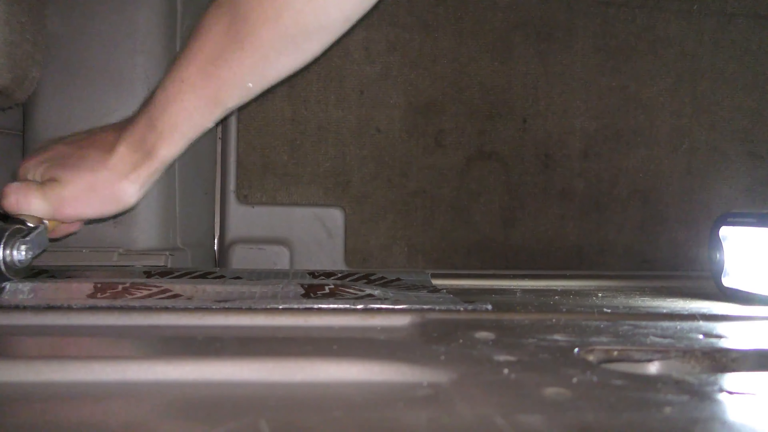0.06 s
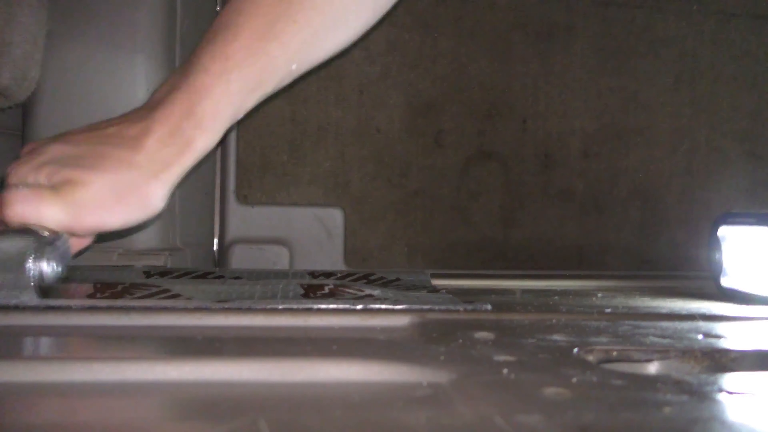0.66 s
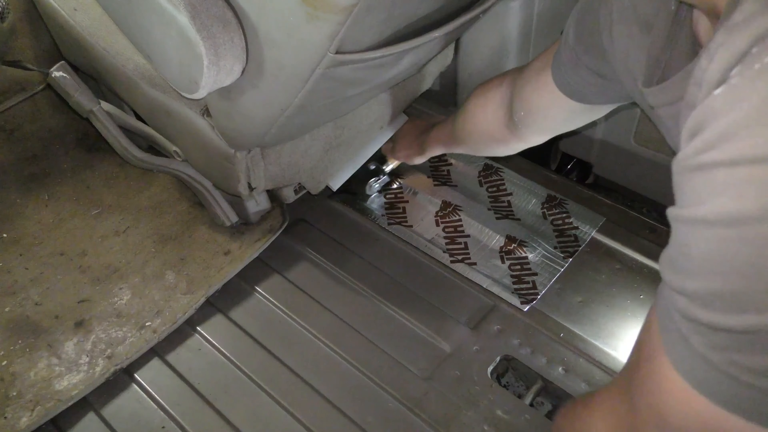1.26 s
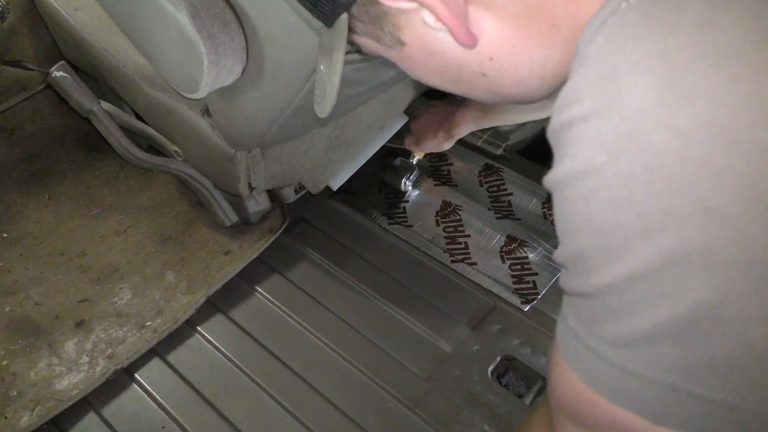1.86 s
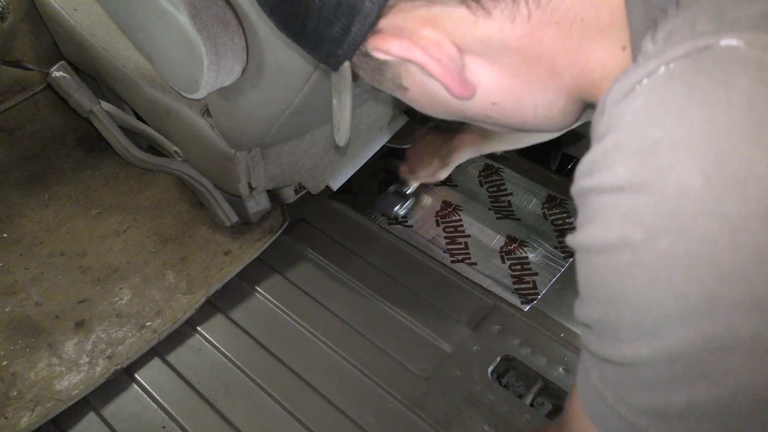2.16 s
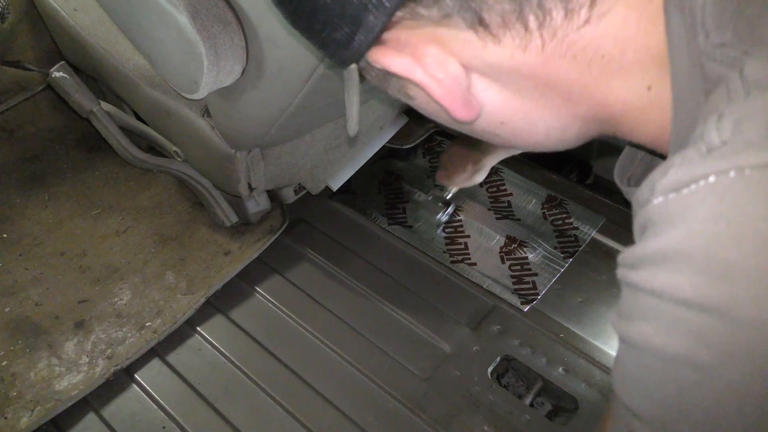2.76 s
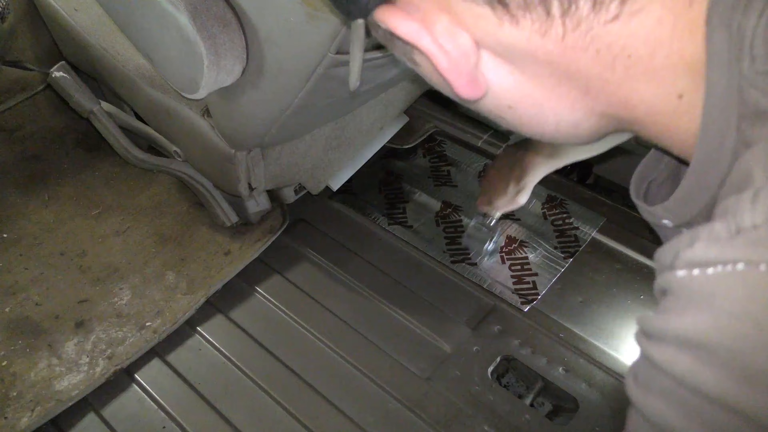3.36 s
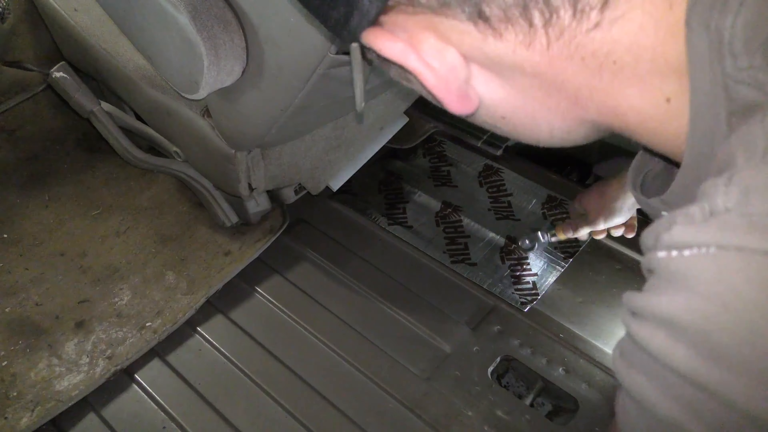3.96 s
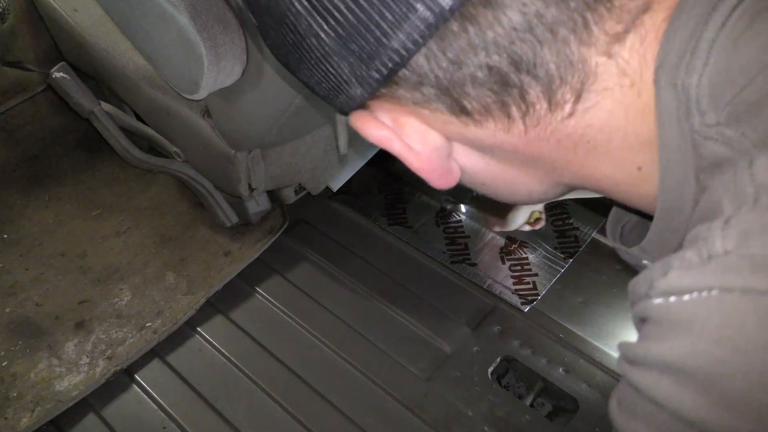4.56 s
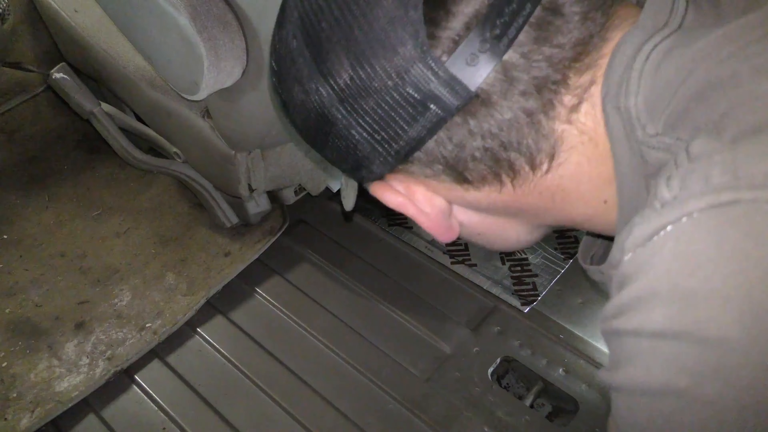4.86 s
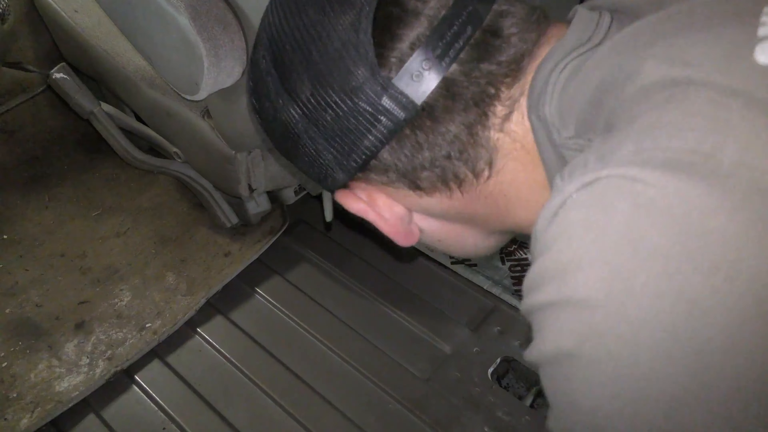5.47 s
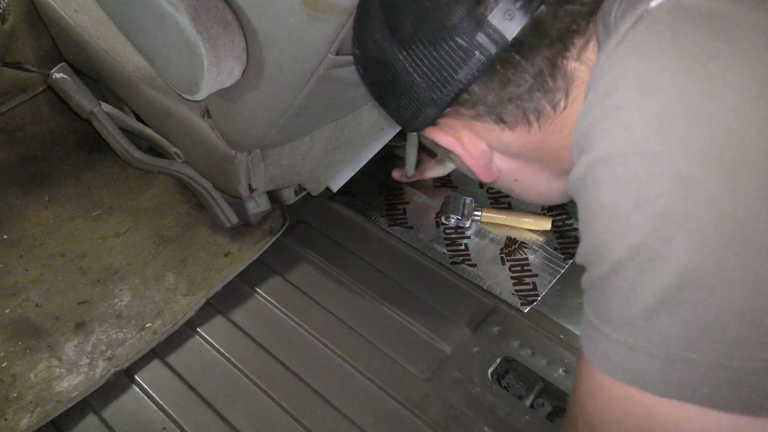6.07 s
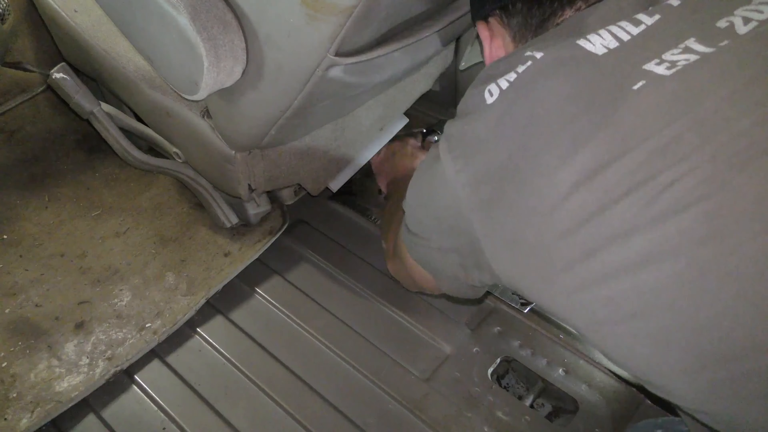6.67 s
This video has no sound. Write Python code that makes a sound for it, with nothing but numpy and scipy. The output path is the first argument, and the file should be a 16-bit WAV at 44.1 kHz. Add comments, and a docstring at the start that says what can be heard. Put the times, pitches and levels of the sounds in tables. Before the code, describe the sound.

Close up inside a van, a hand roller runs over foil matting with a quick, squeaky rattle that makes the sheet-metal floor ring. The sound cuts out for an instant, then returns for a longer stroke with more rubbing. Once the rolling stops, there are short skids, scattered metal clacks and a bright clink, then faint cloth rustle, a dull bump and a few last knocks over low room tone.

```python
"""A steel hand roller presses foil-faced damping mat onto the sheet-metal floor of a van, in two strokes.
On every turn the loose drum judders with a chirp and knocks on its axle; the floor rings, the foil hisses.
The sound breaks off briefly after the first stroke and resumes from above the roller.
Then the roller slides, is lifted and set down with sharp clacks, a shirt swishes and a knee bumps the
floor. Underneath lie a low cabin rumble, room tone and a thin hiss."""
import sys
import numpy as np
from scipy import signal
from scipy.fft import rfft, irfft
from scipy.io import wavfile
from scipy.ndimage import uniform_filter1d

SR = 44100
rng = np.random.default_rng(int(sys.argv[2]) if len(sys.argv) > 2 else 0)


def transcribe(u):
    """Save the signal u as a 16-bit wav file named by the first command-line argument.

    u: samples, shape (n,) or (channels, n), limited to [-1, 1]; the rate is SR.
    q: integer samples, one column per channel.
    """
    v = np.clip(np.atleast_2d(u).T, -1, 1)
    q = np.round(v * 32767).astype(np.int16)
    wavfile.write(sys.argv[1], SR, q)


N = 296352
TIME, BINS = np.arange(N) / SR, np.fft.rfftfreq(N, 1 / SR)
GAP_START_S, GAP_END_S = 1.236, 1.318  # the silence between the two strokes


# The first stroke, turn by turn. Each row: knock time in seconds, then levels in dB for the knock,
# the axle tick, the judder leading into the knock, the back judder half a turn later and the foil hiss.
FIRST_STROKE = [(0.0454, -8.5, -23.5, -31, -48, -42.5), (0.1915, -19.5, -71, -31, -20, -38),
                (.2636, -5.5, -34, -23.5, -36, -38), (.339, -7, -30.5, -27.5, -34, -38),
                (0.406, -7, -32.5, -26, -23, -38), (0.4705, -5.5, -32.5, -22, -35, -40.5),
                (0.5355, -5.5, -45, -22.5, -50, -36.5), (.6042, -6.5, -36, -26, -38, -41),
                (.675, -8, -31, -33, -43, -36), (0.7427, -8.5, -34, -24.5, -42, -41),
                (0.8126, -8, -47, -28, -53, -40), (.875, -7, -34.5, -29.5, -45, -40.5),
                (1.0983, -19.5, -47, -48.5, -58, -49.5), (1.1949, -5.5, -40, -24, -22.5, -33)]
# The second stroke; the knock is weak where the drum misses its stop. Each row: knock time in seconds,
# knock in dB, tick in dB, lead judder in dB, its pitch in Hz, back judder in dB, its pitch in Hz,
# foil hiss in dB.
SECOND_STROKE = [(1.492, -50, -49, -45, 1130, -43, 1010, -47),
                 (1.5761, -13, -45, -24.5, 1058, -47, 1070, -36),
                 (1.657, -17.5, -39, -32.5, 1150.0, -31, 1184, -40.5),
                 (1.7364, -11.5, -34, -22, 1360, -22.5, 1227, -36),
                 (1.823, -12.5, -40, -24, 950, -27, 1364, -37),
                 (1.8924, -8.5, -36, -22, 1177, -30, 1247, -36),
                 (1.9722, -12, -41, -21.5, 1158, -25.5, 1416, -36.5),
                 (2.04, -14.5, -36, -22, 1407, -22, 1207, -33),
                 (2.1102, -12, -33, -21, 1365, -23.5, 1324, -38),
                 (2.1776, -7.5, -30.5, -20, 1233, -24.5, 1340.0, -41),
                 (2.2427, -8.5, -37, -25.5, 1290, -26, 1126, -39.5),
                 (2.3056, -8.5, -32.5, -29, 1410, -22.5, 1234, -34),
                 (2.3688, -8, -27.5, -24, 1370, -25, 1270, -51),
                 (2.4306, -11, -28, -24.5, 1358, -29, 1020, -52),
                 (2.4937, -11.5, -31, -26.5, 1350, -29, 1120, -45),
                 (2.5604, -9.5, -31, -29, 1292, -24, 1230.0, -49),
                 (2.6255, -8.5, -32, -24.5, 1326, -28, 1186, -40.5),
                 (2.6915, -12, -36, -34, 1330, -35, 1220, -40),
                 (2.7536, -11, -34, -40, 1220, -44, 1180, -42),
                 (2.8187, -8, -31.5, -36, 1296, -26, 1190, -38.5),
                 (2.8793, -7.5, -32, -24, 1277, -35, 952, -33.5),
                 (2.9448, -7.5, -34, -26, 1397, -23, 1100, -35.5),
                 (3.0094, -8.5, -32, -30, 1320, -25, 1194, -35),
                 (3.0734, -5.5, -29.5, -30, 1394, -36, 1060, -37.5),
                 (3.1368, -8, -36, -24.5, 1393, -27, 1240, -36.5),
                 (3.202, -9, -49, -26, 1134, -28.5, 1420, -38),
                 (3.263, -5.5, -30, -23.5, 1323, -24.5, 1216, -40.5),
                 (3.3272, -8.5, -42, -25, 1386, -25.3, 1240, -34.5),
                 (3.3904, -7, -34, -22.5, 1370, -24.5, 1265, -35),
                 (3.4524, -8, -27, -24.5, 1380, -26.5, 1306, -35.5),
                 (3.5205, -7, -26, -22.5, 1185, -29, 1180, -36),
                 (3.5826, -9, -29.5, -23, 1308, -31, 1330, -40),
                 (3.648, -34, -38, -23, 1156, -25.5, 1370, -41),
                 (3.7089, -6.5, -29, -23.5, 1364, -27.5, 1270, -34),
                 (3.773, -36, -42, -19.5, 1123, -23, 1230, -37.5),
                 (3.8349, -12, -23, -23, 1365, -23, 1331, -31.5),
                 (3.8968, -6.5, -39, -34, 1164, -37, 1180.0, -37.5),
                 (3.9611, -10.5, -27, -25, 1356, -52, 1053, -35)]

def turns(first_lead_hz=1309, first_back_hz=1096):
    """The roller's rhythm: every turn of the drum, in the columns of the second stroke."""
    first = [(at, knock, tick, lead, first_lead_hz, back, first_back_hz, hiss)
             for at, knock, tick, lead, back, hiss in FIRST_STROKE]
    return first + list(SECOND_STROKE)


# Extra knocks in the first stroke, as the loose drum falls back against its axle.
# Each row: start in seconds, knock level in dB, tick level in dB.
FALLBACKS = [(.195, -9.5, -47), (0.2744, -10.5, -38), (.3546, -9, -35), (.413, -20, -41), (.485, -8.5, -40),
             (.5618, -5, -32.5), (0.6235, -8, -28.5), (0.6995, -7, -27), (.7705, -6, -29),
             (0.8259, -6.5, -36), (.905, -6, -34.5)]
# The hollow note of the panel's belly as the roller crosses it.
# Each row: time in seconds, level against the knock in dB, pitch in Hz.
BELLY = [(0, -19, 763), (1.2, -16.5, 759), (1.6, -7.5, 802), (2.1, -17, 781), (2.24, -17, 798),
         (2.31, -15, 760), (2.4, -7.5, 795), (2.54, -9, 780), (2.63, -10, 800), (2.88, -5.5, 788),
         (3.14, -7.5, 782), (3.3, -15.5, 790), (3.45, -22, 760), (3.95, -25, 810)]

def knocks(hard_hz=1026, ping_hz=4600, bounce_s=0.00624):
    """The drum hits its axle: a thump, a metal tick and a hollow note from the panel."""
    body, ticks, belly = np.zeros((3, N))
    t = TIME[:SR // 4]
    belly_times, *belly_curves = np.transpose(BELLY)
    for at, db, tick_db in list(FALLBACKS) + [row[:3] for row in turns()]:
        pitch_luck, ping_luck, level_luck, lag_luck = rng.standard_normal(4)
        detune = 1 + 0.047 * pitch_luck
        if at < GAP_START_S:  # first stroke: hard and dry
            add(body, at, undb(db) * blow(t, hard_hz * detune, 0.00099, 0.00094, sag=0.1))
            spike = undb(19) * (t == 0)
            add(ticks, at, undb(tick_db) * (snap(t60=.0032) + spike))
        else:  # second stroke: softer, with one bounce
            add(body, at - .0012, undb(db) * soft_knock(t, detune, low_db=-6.5, high_db=-5.5))
            bounce = undb(db + 3.5 * level_luck) * soft_knock(t, detune, low_db=-12.5, high_db=-15)
            add(body, at + bounce_s * (1 + 0.137 * lag_luck), bounce)
            fork_hz = ping_hz * np.exp(0.215 * ping_luck)  # the fork rings differently each time
            ping = np.sin(2 * np.pi * fork_hz * t) * fade(t, 0.025)
            add(ticks, at - .0005, undb(tick_db - 1.5) * (snap(t60=0.0094) + undb(-3) * ping))
        belly_db, belly_hz = (np.interp(at, belly_times, curve) for curve in belly_curves)
        bloom = fade(t, 0.1) * (1 - fade(t, .024))
        add(belly, at, undb(db + belly_db) * np.sin(2 * np.pi * belly_hz * t) * bloom)
    return body, ticks, belly


def soft_knock(t, detune, low_db, high_db, low_hz=831, high_hz=1240):
    """The drum meets its stop and rings briefly in its two main resonances."""
    low = blow(t, low_hz * detune, rise_s=.0022, fall_s=.0034, sag=.03)
    high = blow(t, high_hz * detune, rise_s=.002, fall_s=.0024, sag=.03)
    return undb(low_db) * low + undb(high_db) * high


def blow(t, hz, rise_s, fall_s, sag):
    """The drum bounces on the soft mat: a few damped cycles that sag in pitch as the contact relaxes."""
    attack = np.sin(np.pi / 2 * np.minimum(t / rise_s, 1)) ** 2
    decay = np.exp(-(np.maximum(t - rise_s, 0) / fall_s) ** 2.02)
    pitch = hz * (1 - sag * np.tanh((t - rise_s) / fall_s))
    return np.sin(phase_of(pitch)) * attack * decay


def snap(t60, window_s=0.0017):
    """A crack of steel on steel, with the energy of a short window at rms 1."""
    t = TIME[:SR // 4]
    burst = rng.standard_normal(len(t)) * (fade(t, t60) + undb(-23) * fade(t, .027))
    return burst * np.sqrt(window_s * SR / np.sum(burst ** 2))


# Three chirp shapes. Each row: time from the knock in seconds, pitch as a ratio of the judder's pitch,
# tone level in dB, foil level in dB.
WHIP_JUDDER = [(-.017, .75, -20, -20), (-.011, .88, -2, -7), (-.007, 1.15, 0, 0), (-.003, 1.6, -4, 5),
               (.001, 2.9, -14, -4)]  # first stroke: whips upward until the knock stops it
ARCH_JUDDER = [(-.021, .85, -22, -22), (-.013, .98, 0, -1.5), (-.007, 1.08, 2, -1), (-.001, 1.08, 1, 1),
               (.002, 1.05, -16, -13)]  # second stroke: arches over
BACK_JUDDER = [(.016, .98, -20, -20), (.02, 1.02, 2, -9), (.025, 1.17, 1, -3), (.033, 1.24, -4, -7),
               (.041, 1.2, -22, -30)]  # both strokes: half a turn later

def judders(pitch_wander=0.037, flutter_db=2.6, overtone_db=-27):
    """The drum sticks and slips in two chirps a turn; also returns how hard they crinkle the foil."""
    body, foil_drive = np.zeros((2, N))
    drift = pitch_wander * walk(500)
    flutter = unit(undb(flutter_db * walk(350)))
    chirps = []
    for at, _, _, lead_db, lead_hz, back_db, back_hz, hiss_db in turns():
        lead_shape = WHIP_JUDDER if at < GAP_START_S else ARCH_JUDDER
        chirps.append((at, lead_shape, lead_hz, lead_db, hiss_db))
        chirps.append((at, BACK_JUDDER, back_hz, back_db, hiss_db))
    for at, shape, hz, db, hiss_db in chirps:
        lags, *curves = np.transpose(shape)
        stretch = np.interp(at, [.19, .4, 1.3, 1.7, 2.2], [1.15, 1, 0.93, 1.2, 1])  # strokes start slowly
        lags = lags * np.exp(0.0908 * rng.standard_normal()) * stretch
        span = slice(int((at + lags[0]) * SR), int((at + lags[-1]) * SR))
        ratio, tone_db, foil_db = (np.interp(TIME[span] - at, lags, curve) for curve in curves)
        phase = phase_of(hz * (ratio + drift[span]))
        tone = np.sin(phase) + undb(overtone_db) * np.sin(2 * phase)
        body[span] += np.sqrt(2) * undb(db + tone_db - 3) * flutter[span] * tone
        foil_drive[span] += undb(hiss_db + foil_db)
    return body, foil_drive


# The ring of the floor panel and cabin. Each row: pitch in Hz, gain at resonance in dB, t60 in seconds.
PANEL_MODES = [(244, -8.5, 0.026), (384.6, 5, 0.19), (419.4, 6, 0.11), (558, -3, 0.045), (663, -6.5, 0.47),
               (784, -0.5, 0.1), (940, -1.5, 0.033), (836, -10, 0.068), (980, -30, 0.22),
               (1160, -1.5, 0.063), (1186, -8, 0.049), (1326, -14, 0.05), (1453, 2, 0.042),
               (1600, -11, 0.065), (1790, 1, 0.1), (1880, 0.5, 0.056), (2118, 6.5, 0.055)]

def floor_panel(force, ring_db, scatter_db, detune=0.0024, build_t60=0.013, low_cut_hz=230):
    """The direct push plus the panel's modes, which build up later; the small patch radiates no bass."""
    t = TIME[:SR // 3]
    ring = np.zeros(len(t))
    shares = undb(scatter_db * rng.standard_normal(len(PANEL_MODES)))
    for share, (hz, db, t60) in zip(shares, PANEL_MODES):
        gain = share * undb(db) * 2 * np.log(1000) / (t60 * SR)
        pitch = hz * (1 + detune * rng.standard_normal())
        ring += gain * np.cos(2 * np.pi * pitch * t) * fade(t, t60)
    ringing = signal.fftconvolve(force, ring * (1 - fade(t, build_t60)))[:len(force)]
    return low_cut(force + undb(ring_db) * ringing, low_cut_hz)


def rolling_floor(force, spot_s=.11, spots=3):
    """The drum loads the panel as it travels, so each spot rings a little differently."""
    out = np.zeros(N)
    place = TIME / spot_s % spots
    ring_db = np.where(TIME < GAP_START_S, -4, -2)  # the first stroke, near the edge, rings less
    for spot in range(spots):
        distance = np.abs((place - spot + spots / 2) % spots - spots / 2)
        out += floor_panel(force * np.clip(1 - distance, 0, 1), ring_db, scatter_db=0.5, detune=0.01)
    return out


# Foil rubbing under drum and hand. Each row: time in seconds, floor rub in dB, hiss in dB.
RUB_LEVELS = [(0.0, -39, -48.5), (.3, -36.5, -54), (.8, -37, -71), (.95, -53.5, -68), (1.151, -50, -65),
              (1.42, -47.5, -58.5), (1.58, -35, -45.5), (2.5, -25.5, -45), (3.0, -29.5, -45.5),
              (3.799, -33, -43.5), (3.92, -23, -38.5), (4.01, -40.5, -45), (4.07, -53, -58),
              (4.202, -54.5, -65), (5.7, -52, -62), (5.8, -61.5, -67), (6.05, -59, -68), (6.72, -55, -65)]
# The drum skids over the foil. Each row: start and length in seconds, floor rub in dB, hiss in dB.
SKIDS = [(1.035, .03, -45, -43), (1.092, 0.017, -32, -44), (1.14, 0.045, -30, -40),
         (1.319, 0.039, -36, -40), (1.378, 0.022, -39, -47), (1.5, 0.025, -37, -50),
         (3.828, 0.014, -37, -34), (4.22, 0.24, -49, -52), (4.335, 0.082, -42, -44.5),
         (4.418, 0.13, -31, -37.5), (4.546, 0.079, -33.5, -37), (4.599, 0.25, -43.5, -44.5),
         (5.007, 0.13, -40.5, -42.5), (5.135, 0.071, -40, -42), (5.478, 0.094, -39, -41),
         (6.149, 0.19, -53, -56), (6.467, 0.12, -44, -42), (6.595, 0.066, -52, -51),
         (6.685, 0.054, -34.5, -36)]
# EQ for the dull rub and the bright hiss. Each row: frequency in Hz, level in dB.
RUB_EQ = [(100, -26.5), (250, -14), (450, -8), (750, -0.5), (1100, 1), (1450, -1.5), (1800, -7.5),
          (2400, -15), (3500, -31)]
HISS_EQ = [(1500, -6.5), (2300, -11), (3100, -4), (4000, -0.5), (5050, 2.5), (5400, 2), (5800, 1.5),
           (6700, -3), (9000, -5.5), (12000, -9.5), (16000, -19.5)]

def foil(judder_drive, slide_lag_s=0.009, slide_s=0.061):
    """Rolling, skidding and juddering on the foil send a rub into the floor and a hiss into the air."""
    times, *curves = np.transpose(RUB_LEVELS)
    rub_db, hiss_db = (np.interp(TIME, times, curve) for curve in curves)
    # the drum slides on after each landing
    slides = [(at + slide_lag_s, slide_s, db - 33, db - 37.5) for at, db, *_ in CLACKS]
    skids = list(SKIDS) + slides
    skid_rub = swipes([(at, length, db) for at, length, db, _ in skids], catch_s=0.018, droop_db=5)
    skid_hiss = swipes([(at, length, db) for at, length, _, db in skids], catch_s=0.015, droop_db=9.5)
    grip = slack() * unit(undb(2 * walk(60)))  # the foil grips unevenly
    rub_gain = (undb(rub_db - 3.5) + undb(-1.5) * skid_rub) * grip + undb(5.5) * judder_drive
    hiss_gain = (undb(hiss_db - 0.5) + undb(-6.5) * skid_hiss) * grip + undb(-3.5) * judder_drive
    return colour(grit(4), RUB_EQ) * rub_gain, colour(crinkle(), HISS_EQ) * hiss_gain


def slack(lead_s=0.018, half_width_s=0.017, depth_db=-4):
    """Gain of the rubbing, which dips once a turn just before the drum catches again."""
    dips = np.zeros(N)
    bell = np.exp(-np.linspace(-2, 2, int(4 * half_width_s * SR)) ** 2)
    for at, *_ in turns():
        add(dips, at - lead_s - 2 * half_width_s, bell)
    return undb(depth_db * dips)


def crinkle(pops_per_s=1000, size_spread_db=4, shift_db=3):
    """Foil creases pop at random over a fine hiss; the colour shifts as the drum meets new creases."""
    pops = (rng.random(N) < pops_per_s / SR) * rng.choice([-1, 1], N)
    pops = pops * undb(size_spread_db * rng.standard_normal(N))
    spectrum = rfft(grit(1.6) + undb(1) * unit(pops))
    centres_hz = np.geomspace(2000, 14000, 9)
    bands = (irfft(spectrum * np.interp(BINS, centres_hz, pick), N) for pick in np.eye(len(centres_hz)))
    return unit(sum(band * undb(shift_db * walk(90)) for band in bands))


# The roller is set down or rattles in its fork; a glancing click has no lows. Each row: start in seconds,
# thud level in dB, thud pitch in Hz, thud attack in seconds, click level in dB, click low cut in Hz,
# then the struck spot's note: pitch in Hz, level in dB, t60 in seconds.
CLACKS = [(1.019, -25.5, 1140, 0.00064, -36.5, 900, 750, -37, .03),
          (4.09, -12.5, 1110, 0.0008, -26, 1000, 528, -35, .08),
          (4.877, -28.5, 790, 0.00054, -19, 3670, 697, -36, 0.043),
          (4.925, -10.5, 790, 0.00063, -10, 400, 520, -29, 0.12),
          (5.052, -30, 784, .0007, -16.5, 4200, 670, -33, 0.049),
          (5.071, -12.5, 800, 0.00061, -11, 400, 556, -26.5, 0.09),
          (5.197, -33, 760, 0.0024, -26.5, 3700, 630, -37, 0.055),
          (5.264, -23, 940, 0.00059, -28, 1000, 600, -42, .03),
          (5.271, -11, 1270, 0.0006, -25.5, 1000, 622, -31, 0.066),
          (5.338, -18.5, 890, 0.0038, -17, 4300, 535, -24.5, 0.031),
          (5.4177, -12, 930, 0.00083, -10, 400, 473, -29.5, 0.15),
          (5.4929, -15, 1310, 0.00057, -45, 1000, 723, -31, 0.047),
          (5.556, -22.5, 950, 0.0011, -15, 4320, 636, -22, 0.038),
          (5.609, -8, 867, 0.0022, -13, 400, 470, -28.5, 0.1),
          (5.676, -14, 1140, 0.0006, -21.5, 1000, 594, -34, 0.046),
          (5.681, -14.5, 1390, 0.00063, -32, 1000, 774, -30, .05),
          (5.948, -50, 600, .0007, -38, 1000, 590, -49, .04),
          (6.36, -13, 1140, .001, -37.5, 400, 810, -28, .05),
          (6.395, -14.5, 1130, .001, -27, 1000, 695, -40, 0.065),
          (6.660, -13, 1070, 0.0018, -26, 403, 805, -31, .05)]
# The ring of the steel fork. Each row: pitch in Hz, level in dB, t60 in seconds.
FORK_MODES = [(2650, -28, 0.1), (3800, 1, 0.011), (4060, -17, 0.039), (4430, 7, 0.016), (4737, -30, 0.15),
              (5130, 14.5, 0.0081), (6350, -15, 0.044)]

def clacks(note_bend=.1, buzz_db=4):
    """The drum drops on the mat and its axle cracks against the fork; each floor spot has its own note."""
    body, clicks, crunch = np.zeros((3, N))
    t = TIME[:SR // 4]
    for at, thud_db, hz, rise_s, click_db, cut_hz, note_hz, note_db, note_t60 in CLACKS:
        push = undb(thud_db - 8.5) * blow(t, hz, rise_s, fall_s=0.004, sag=0.046)
        add(body, at, floor_panel(push, ring_db=1, scatter_db=-1))
        # the panel gives way more slowly, and its note sags as the load lets go
        swell = fade(t, note_t60) * (1 - fade(t, 0.017)) ** 2
        note = np.sin(phase_of(note_hz * (1 + note_bend * (2 * fade(t, .14) - 1))))
        buzz = undb(buzz_db * walk(248)[:len(t)])
        add(body, at, undb(note_db) * swell / swell.max() * note * buzz)
        # the drum's edge crushes the foil
        add(crunch, at, undb(thud_db - 10) * rng.standard_normal(len(t)) * fade(t, 0.048))
        add(clicks, at, undb(click_db) * low_cut(axle_click(t, click_db), cut_hz))
    crunch_eq = [(200, -19.5), (380, 2.5), (700, 0.5), (1000, 4), (1400, 2.5), (2150, -8.5),
                 (2600, -27), (5000, -21.5)]
    return body + colour(crunch, crunch_eq), clicks


def axle_click(t, strength_db, firm_t60=0.011, doubling_db=14.5):
    """Crack, rattle and fork ring: a firm click stops at once, a light one rattles on."""
    shares = rng.standard_normal(len(FORK_MODES))
    ring = sum(share * undb(db) * np.sin(2 * np.pi * hz * t) * fade(t, t60)
               for share, (hz, db, t60) in zip(shares, FORK_MODES))
    rattle_t60 = firm_t60 * 2 ** (-strength_db / doubling_db)
    rattle = rng.standard_normal(len(t)) * (fade(t, rattle_t60) + undb(-39) * fade(t, .08))
    return undb(-12) * snap(t60=0.001) + undb(-10) * rattle + undb(-13) * ring / np.abs(ring).max()


def fork_clink(at=5.712, level_db=-6):
    """The bare fork rings high and leaves the floor still; its many weak modes die away as a sizzle."""
    clink, sizzle = np.zeros((2, N))
    t = TIME[:SR // 2]
    ring = sum(undb(db) * np.sin(2 * np.pi * hz * t) * fade(t, t60) for hz, db, t60 in FORK_MODES)
    add(clink, at, ring * (1 - fade(t, 0.001)) / np.abs(ring).max())
    tail = undb(-11.5) * fade(t, 0.02) + undb(-27.5) * fade(t, 0.33)
    add(sizzle, at, rng.standard_normal(len(t)) * tail)
    sizzle_eq = [(300, -18), (1500, -5), (2700, -9), (3700, -0.5), (4600, -1.5), (6300, -7.5),
                 (8500, -15.5), (16000, -29)]
    return undb(level_db) * (clink + colour(sizzle, sizzle_eq))


# EQ for the steel, heard from beside the drum and from above. Each row: frequency in Hz, level in dB.
SIDE_EQ = [(700, -8.5), (1800, -10), (2400, 6.5), (2900, 3.5), (3800, 2), (4800, -0.5), (6500, -2),
           (9000, -9.5), (16000, -18)]
ABOVE_EQ = [(100, -60), (700, 3), (1800, -2.5), (2700, 2), (3600, 1), (4800, 4), (6200, 1), (9000, -5.5),
            (16000, -14)]

def axle_metal(ticks, clicks):
    """The axle's bright edge: first-stroke ticks sound from the side, later ticks and clicks from above."""
    early = TIME < GAP_END_S
    return colour(ticks * early, SIDE_EQ) + colour(ticks * ~early + clicks, ABOVE_EQ)


# Shirt swishes. Each row: start in seconds, length in seconds, level in dB.
SWISHES = [(6.062, 0.13, -44.5), (6.225, 0.14, -45)]
# EQ for the cloth. Each row: frequency in Hz, level in dB.
CLOTH_EQ = [(500, -3.5), (1500, 2), (2900, -10.5), (4500, 0.5), (7500, 1), (11000, 1.5), (16000, -7)]

def shirt():
    """Cloth brushes past: fine, airy friction that catches and trails off."""
    return colour(grit(1.3), CLOTH_EQ) * swipes(SWISHES, catch_s=0.018, droop_db=15)


def knee(at=6.264, boom_db=-37, shove_db=-48):
    """A soft, dull bump that wakes the lowest floor modes."""
    out, t = np.zeros(N), TIME[:SR // 2]
    boom = np.sin(2 * np.pi * 76 * t) * (1 - fade(t, 0.18)) * fade(t, 0.4)
    shove = np.sin(2 * np.pi * 150 * t) * fade(t, 0.44)
    shove += undb(9.5) * np.sin(2 * np.pi * 255 * t) * fade(t, 0.066)
    add(out, at, undb(boom_db) * boom + undb(shove_db) * shove)
    return out


def rumble(force, boom_db=-51, sway_left_db=-35, sway_right_db=-54):
    """Rolling makes the cabin boom a little; the early turns also shake deep down, mostly on the left."""
    effort = np.sqrt(np.abs(uniform_filter1d(force ** 2, size=300)))
    boom_eq = [(25, -40), (58, -14), (76, 8), (100, -19), (160, 0), (280, -6), (600, -36)]
    boom = spread(*colour(rng.standard_normal((2, N)), boom_eq), side_db=-16)
    sway = colour(rng.standard_normal((2, N)), [(25, -5.5), (70, 16), (150, 4.5), (500, -41)])
    early = np.interp(TIME, [1.9, 2.4], [1, 0])
    return effort * (undb(boom_db) * boom + early * undb([[sway_left_db], [sway_right_db]]) * sway)


def cabin(x, wet_db, t60, side_db):
    """The cramped cabin adds dense, short reflections in stereo."""
    t = TIME[:SR // 2]
    tails = rng.standard_normal((2, len(t))) * fade(t, t60) * (1 - fade(t, 0.016))
    tails /= np.sqrt(np.sum(tails ** 2, axis=1, keepdims=True))
    return x + undb(wet_db) * signal.fftconvolve(x[None], spread(*tails, side_db), axes=1)[:, :N]


# EQ for the room tone. Each row: frequency in Hz, level in dB.
ROOM_EQ = [(18, -67), (35, -43), (62, -17), (123, -10.5), (561, 0), (897, -10.5), (1470, -22), (2420, -30),
           (5590, -14.5), (8500, -17.5), (15500, -23)]

def room_tone(db=-57):
    """A quiet, steady bed of noise, almost mono."""
    return undb(db) * spread(*colour(rng.standard_normal((2, N)), ROOM_EQ), side_db=-27)


def thin_hiss(hz=7750, width_hz=550, db=-68):
    """A narrow, steady hiss high in the background."""
    band = 1 / (1 + (2 * (BINS - hz) / width_hz) ** 4)
    return undb(db) * unit(irfft(rfft(rng.standard_normal(N)) * band, N))


def swipes(rows, catch_s, droop_db):
    """Envelope of (start s, length s, dB) swipes that catch quickly, weaken and let go."""
    out = np.zeros(N)
    for at, length, db in rows:
        t = TIME[:int(length * SR)]
        progress = t / length
        gate = (1 - np.exp(-t / catch_s)) * (1 - progress ** 5)
        add(out, at, undb(db + droop_db * (.5 - progress)) * gate)
    return out


def grit(spread_db):
    """Friction noise: dense tiny slips of uneven size."""
    return unit(rng.standard_normal(N) * undb(spread_db * walk(2500)))


def walk(rate_hz):
    """Smooth random wander at rms 1."""
    hold = max(int(SR / rate_hz), 1)
    steps = np.repeat(rng.standard_normal(N // hold + 1), hold)
    return unit(uniform_filter1d(steps, hold)[:N])


def colour(x, eq):
    """Minimum-phase EQ of unit power gain through (Hz, dB) points."""
    gain = unit(undb(over_bins(eq)))
    cepstrum = irfft(np.log(gain), N)
    cepstrum[1:N // 2] *= 2
    cepstrum[N // 2 + 1:] = 0
    return irfft(rfft(x) * np.exp(rfft(cepstrum)), N)


def over_bins(points):
    """Join (Hz, value) points on a log-frequency axis."""
    hz, value = np.transpose(points)
    return np.interp(np.log(BINS + 1), np.log(hz + 1), value)


def low_cut(x, hz):
    """Second-order high-pass."""
    return signal.sosfilt(signal.butter(2, hz, "high", fs=SR, output="sos"), x)


def spread(mid, side, side_db):
    """Left and right from mid and side."""
    return mid + undb(side_db) * side * np.array([[1], [-1]])


def add(track, at, sound):
    """Mix a sound into a track at a time in seconds."""
    start = max(int(at * SR), 0)
    part = sound[:max(N - start, 0)]
    track[start:start + len(part)] += part


def phase_of(hz):
    """Running phase of a gliding pitch."""
    return 2 * np.pi * np.cumsum(hz) / SR


def fade(t, t60):
    """Exponential decay, 60 dB down after t60 seconds."""
    return np.exp(-np.log(1000) * t / max(t60, 1e-3))


def unit(x):
    """Scale to rms 1."""
    return x / np.sqrt(np.mean(x ** 2))


def undb(db):
    """Decibels to gain."""
    return 10 ** (np.asarray(db) / 20)


def scene():
    """The mix: roller and foil drive the floor and the air of the cabin."""
    knock, ticks, belly = knocks()
    judder, foil_drive = judders()
    thud, clicks = clacks()
    rub, hiss = foil(foil_drive)
    hiss = cabin(hiss, wet_db=-3.5, t60=0.03, side_db=-8)  # seat and floor close by colour the crinkle
    cloth = shirt()
    metal = axle_metal(ticks, clicks) + fork_clink()
    chirps = floor_panel(judder, ring_db=-12, scatter_db=1)  # mostly straight from the drum
    floor = cabin(rolling_floor(knock + rub) + chirps + belly + thud, wet_db=-11.5, t60=0.12, side_db=-2.5)
    bright = cabin(metal + cloth, wet_db=-11, t60=0.063, side_db=-4)
    room = room_tone()
    bass = rumble(knock + .5 * (judder + rub)) + knee()
    return floor + bright + hiss + bass + room + thin_hiss()


# Balance of the two microphone ports. Each row: frequency in Hz, left minus right in dB.
PORT_BALANCE = [(60, -1.5), (110, 5), (200, 4.5), (380, 3.5), (700, 1.5), (1290, -0.5), (2380, -3.5),
                (4400, 0.5), (8120, 0), (15000, -0.5)]
# Phase between the ports. Each row: frequency in Hz, lead of the left in radians.
PORT_PHASE = [(0, -0.4), (860, -0.43), (1640, -0.13), (1980, -0.84), (2240, 0.38), (2840, 0.85),
              (3190, -0.49), (3450, 0.89), (4740, 0.66), (5430, 0.81), (5770, 1), (6550, -0.0),
              (7920, -0.97), (16500, -0.18)]

def record(dry, top_hz=16000):
    """Two close ports differ in level and phase; the sound breaks off briefly; the top is cut."""
    half_difference = over_bins(PORT_BALANCE) * np.log(10) / 40 + .5j * over_bins(PORT_PHASE)
    ports = irfft(rfft(dry) * np.exp(np.array([half_difference, -half_difference])), N)
    gate = uniform_filter1d(1. * ((TIME < GAP_START_S) | (TIME > GAP_END_S)), size=40)
    return signal.sosfilt(signal.ellip(10, .2, 70, top_hz, fs=SR, output="sos"), ports * gate)


dry = scene()
out = record(dry)
transcribe(out)
```